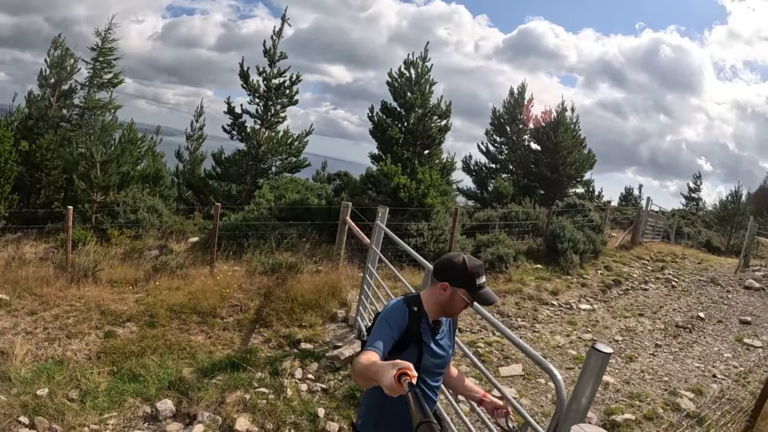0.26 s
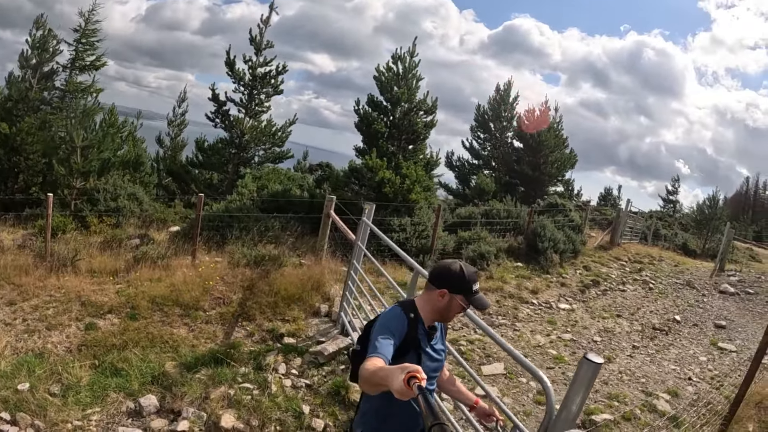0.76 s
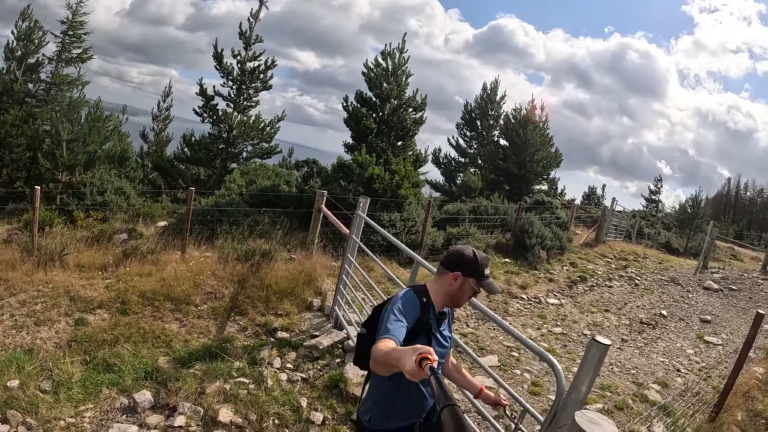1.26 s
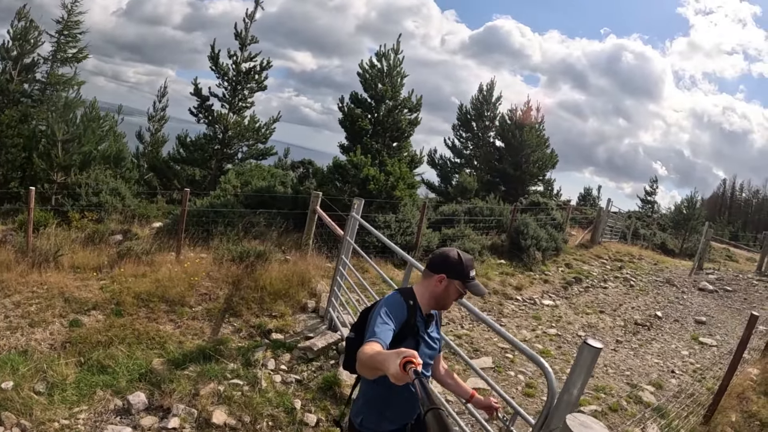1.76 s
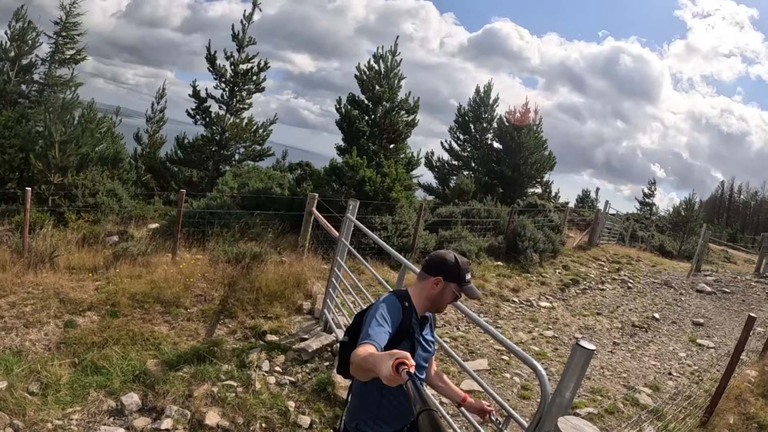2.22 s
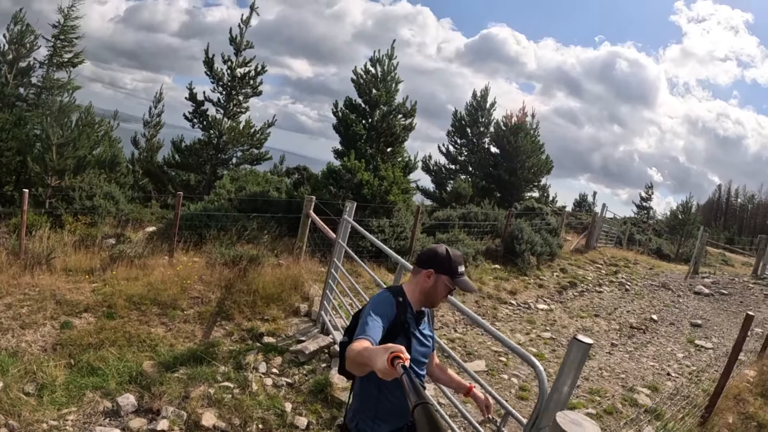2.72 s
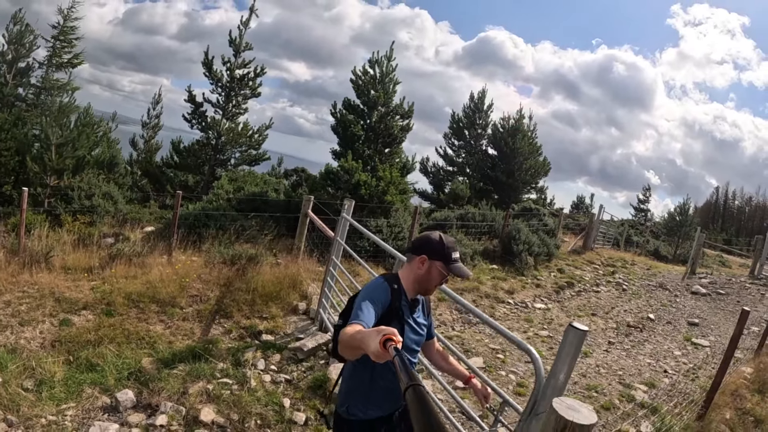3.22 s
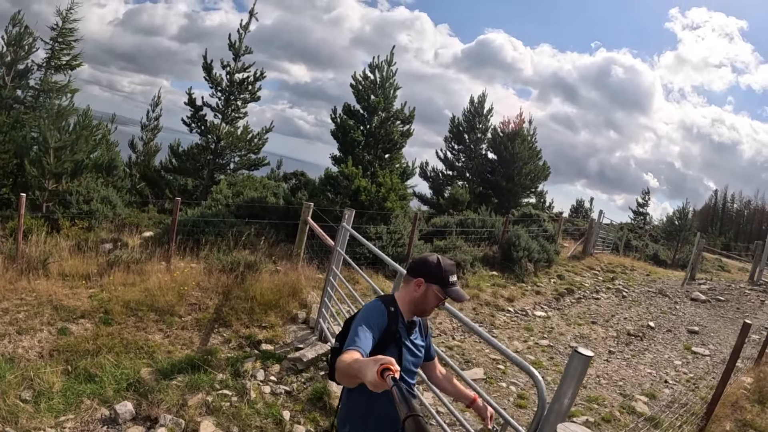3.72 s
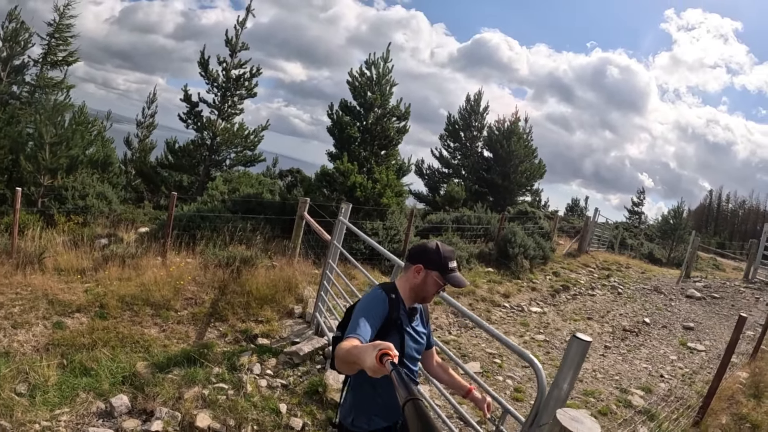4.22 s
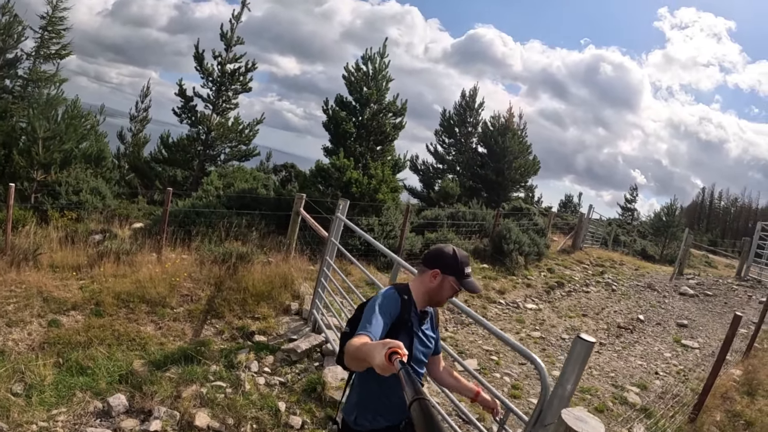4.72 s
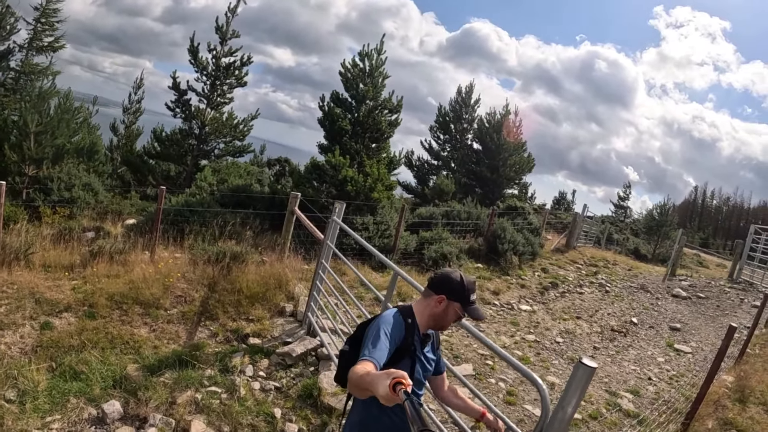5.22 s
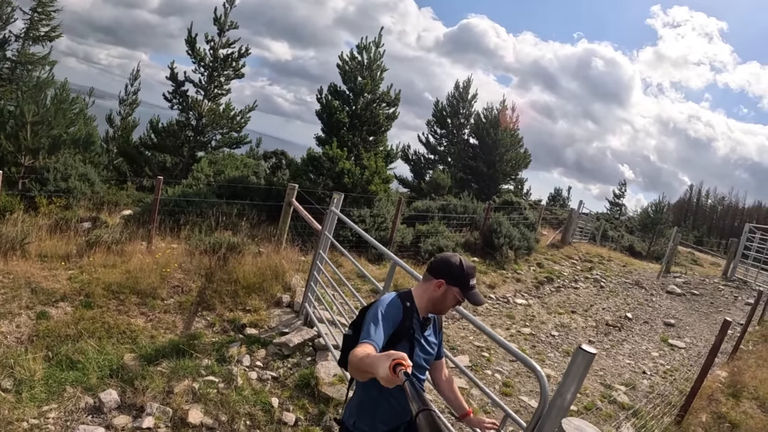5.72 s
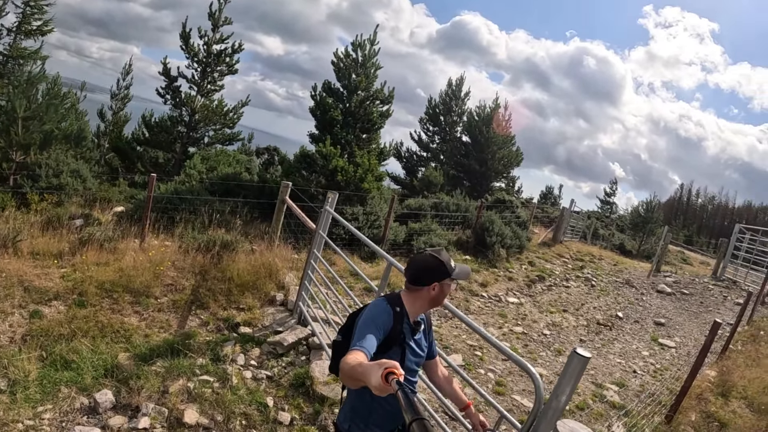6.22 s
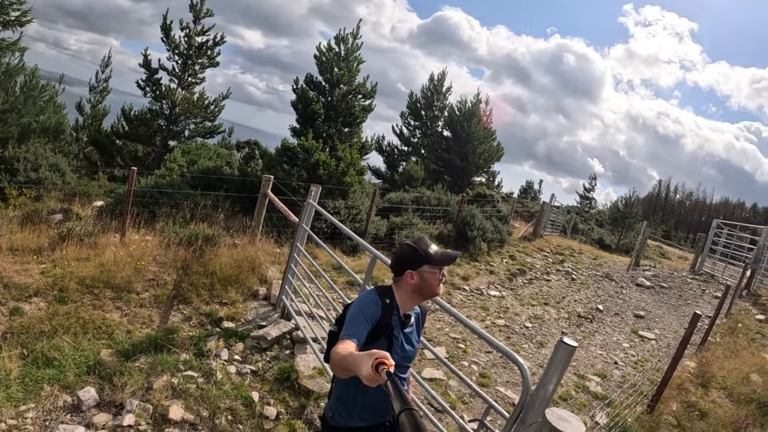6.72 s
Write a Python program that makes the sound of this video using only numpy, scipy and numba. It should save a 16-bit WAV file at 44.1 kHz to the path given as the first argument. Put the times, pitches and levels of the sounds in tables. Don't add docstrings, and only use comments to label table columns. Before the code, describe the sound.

On a breezy hillside, a steel field gate is jostled and unlatched at close range. Soft jolts and rattling surround sharp knocks, small parts ping, and long wavering tones overlap. After a short lull come rapid, heavy clangs with dull thuds from the post, then fading resonance and a lighter stir. Wind rumbles at the microphone; the sound is dry, open and nearly mono.

```python
import sys
import numpy as np
from numba import njit
from scipy import signal
from scipy.fft import rfft, irfft
from scipy.io import wavfile
from scipy.ndimage import uniform_filter1d

SR = 44100
rng = np.random.default_rng(int(sys.argv[2]) if len(sys.argv) > 2 else 0)


def volts_from_decibels(level):
    exponent = np.asarray(level, float) / 20
    return 10 ** exponent


def inscribe(sig):
    pcm = np.round(np.clip(np.atleast_2d(sig).T, -1, 1) * 32767)
    wavfile.write(sys.argv[1], SR, pcm.astype(np.int16))


N = 306936

COLOUR_HZ = (550, 2000, 5600, 11000)
# start_s, level_db, then against that level bass_db, top_db, crack_db
CLANKS = [(.0627, -5, -13, -21.5, -11), (0.9777, -6.5, -38, -31.5, -9), (1.042, 1.5, -36.5, -22, -10),
          (1.41, -6, -29, -34, -12), (1.6297, -7.5, -18.5, -20, -2), (2.151, -7, -20.5, -34, -8),
          (2.319, -8, -34, -32, -12), (2.4244, -1.7, -28.5, -30, -17), (3.1151, -14, -11, -33, -10),
          (3.38, -18.5, -25, -40, -8.5), (3.5014, -14.5, -21, -25, -5), (4.14, -34.5, 3, -46, -1.5),
          (4.342, -18.5, -10.5, -30, -10), (4.5281, -0.4, -17.5, -15.5, -7), (4.636, -6, -24, -20, -17),
          (4.8075, -4, -14.5, -21, -13), (4.8289, -5.5, -13, -10.5, -3), (5.1822, -3.5, -15, -8.5, -25),
          (5.1997, -4.5, -14, -10, -5), (5.2597, -7.5, -9, -11.5, -2.5), (5.3506, -0.9, -12.5, -23.5, -11),
          (5.4002, -7, -17, -24, -2), (5.4395, -2, -12, -19, -1), (6.36, -14, -5, -40, -14)]


def evened(x):
    return x / np.sqrt(np.mean(x ** 2) + 1e-20)


def read(hz, value, at_hz):
    return np.interp(np.log(at_hz + 1), np.log(np.asarray(hz) + 1), value)


def along(rows):
    s, *columns = np.transpose(rows)
    return [np.interp(np.arange(N) / SR, s, column) for column in columns]


def noise(points, patchy_db):
    hz = np.fft.rfftfreq(1024, 1 / SR)
    real, imag, patches = rng.standard_normal((N // 256 + 5, 513, 3)).T
    patches = uniform_filter1d(patches, size=10, axis=0)
    patches = evened(uniform_filter1d(patches, size=12, axis=1))
    colour_db = read(*np.transpose(points), hz)[:, None]
    bins = (real + 1j * imag) * volts_from_decibels(colour_db + patchy_db * patches)
    return evened(signal.istft(bins, nperseg=1024, noverlap=768)[1][:N])


def add(mix, s, db, hz, t60, rise, loose=1):
    part = mix[round(s * SR):][:SR]
    t = np.arange(len(part)) / SR
    level = volts_from_decibels(db - 60 * t / t60) * (1 - np.exp(-t / rise))
    part += level * np.sin(2 * np.pi * (hz * t + loose * rng.random()))


def hill_air():
    # pitch_hz, density_db (per Hz)
    air_colour = [(59, -37), (100, -10), (358, -1.5), (513, -0.5), (1280, -3), (1650, -15), (2630, -18.5),
                  (8640, -31), (16000, -28)]
    return volts_from_decibels(-54) * noise(air_colour, patchy_db=1.2)


def wind():
    # start_s, buffet_db
    gusts = [(0, -54), (.33, -44), (.5, -55), (.95, -53.5), (1.16, -44), (1.28, -78), (2.95, -82),
             (3.25, -68), (3.62, -63), (4.2, -105), (4.5, -55), (5.1, -62.5), (5.54, -52), (5.95, -50.5),
             (6.3, -52.5), (6.61, -46), (6.77, -55.5), (6.96, -46)]
    # pitch_hz, density_db (per Hz)
    buffet_colour = [(12, -15), (25, 0), (45, -12), (70, -8), (110, -36), (300, -90)]
    # pitch_hz, density_db (per Hz)
    roar_colour = [(30, -44), (55, -12), (80, -5), (140, -10), (220, -7.5), (350, -17.5), (700, -90)]
    step_s, flutter_s, flutter_db = .01, .05, 3
    steps = rng.standard_normal(round(N / SR / step_s) + 2)
    lumps = evened(signal.lfilter([1], [1, -np.exp(-step_s / flutter_s)], steps))
    flutter = np.interp(np.arange(N) / SR / step_s, np.arange(len(steps)), lumps)
    gust_db = along(gusts)[0] + flutter_db * flutter
    buffet = volts_from_decibels(gust_db) * noise(buffet_colour, patchy_db=2.5)
    roar = volts_from_decibels(-29 + .42 * gust_db) * noise(roar_colour, patchy_db=3.0)
    return buffet + roar


def hand():
    # start_s, shaking_db, grip (0-1, damps the ring)
    handling = [(0, -48, .1), (.11, -44, 0), (.25, -23.5, 0.21), (.5, -28.5, 0.14), (.95, -32, 0.14),
                (1.16, -26, 0.26), (1.92, -36, 0.13), (2.44, -27, 0.1), (3.57, -39, 0.41), (3.8, -66, 0.34),
                (4.2, -65, 0.05), (4.5, -25.5, 0.23), (5.31, -24.5, 0.22), (5.76, -21, 0.33),
                (6.07, -53.5, 0), (6.36, -39, 0), (6.53, -28, 0.32), (6.8, -43, 0.12)]
    press_s, shiver_s = 0.18, 0.13
    shake_db, grip = along(handling)
    since = np.arange(N) / SR - np.transpose(CLANKS)[0][:, None]
    press = (np.clip(1 + since / press_s, 0, 1) * (since < 0)).max(0)
    shiver = (np.exp(-abs(since) / shiver_s) * (since > 0)).max(0)
    rub_db = -42 + 0.9 * shake_db
    return rub_db, shake_db + 4 * shiver, grip + 0.17 * press


def bolt_rub():
    # start_s, rise_s, fall_s, top_db
    scuffs = [(.26, 0.085, .06, -41.5), (.36, 0.056, 0.21, -39), (.66, 0.15, 0.16, -49.5),
              (1.06, .09, .25, -46), (2.31, 0.017, 0.39, -49), (3.12, 0.016, 0.59, -48),
              (3.5, .1, 3.5, -66), (1.65, 0.11, 3.5, -60), (4.27, 0.04, 0.5, -50), (6.865, .01, .04, -57),
              (4.45, .07, 0.4, -48), (4.8, 0.085, 0.28, -35), (5.2, .05, .12, -51),
              (5.32, 0.055, 0.29, -36), (5.6, 0.064, 0.62, -49), (4.13, .01, .1, -62), (2.42, .02, .5, -50),
              (5.82, 0.049, .07, -45), (6.269, .07, 0.056, -61), (6.37, 0.074, 0.1, -55),
              (6.798, 0.017, 0.069, -55)]
    # pitch_hz, density_db (per Hz)
    rub_colour = [(2500, -7), (4000, 1.5), (5500, -7), (7000, -5), (9000, -4.5), (11000, -13.5),
                  (13000, -21), (16000, -38)]
    t = np.arange(N) / SR
    level = volts_from_decibels(hand()[0]) + volts_from_decibels(-76.5)
    for s, rise, fall, db in scuffs:
        late = t - s - rise
        shape_db = np.where(late < 0, 16 * late / rise, -34.5 * late / fall)
        level = level + volts_from_decibels(db + shape_db) * np.clip((t - s) / .01, 0, 1)
    grains = uniform_filter1d(rng.exponential(1, N) ** 2 - 2, size=60)
    grit = volts_from_decibels(2.0 * evened(grains))
    return level * evened(noise(rub_colour, patchy_db=1.5) * grit)


def latch_rings():
    # start_s, level_db, pitch_hz, t60_s, scatter (share of pitch)
    lone_tubes = [(0, -46, 881, .68, .0018), (.33, -35, 3600, .8, .15), (.41, -37, 3500, .5, .12),
                  (1.04, -32, 4170, 0.69, 0.059), (1.042, -31, 3900, 0.71, 0.05),
                  (1.045, -24.5, 1907, 0.44, 0.17), (1.63, -38, 3700, 0.5, .03),
                  (3.502, -37, 3920, .15, .052), (3.502, -43, 2760, .7, .035),
                  (3.502, -45, 4000, 0.48, .022), (-0.3, -37, 420, .07, 0.48), (5.40, -38, 3000, .8, 0.12),
                  (5.440, -17, 923, .32, .001), (5.441, -22, 630, 0.27, .2), (5.5, -37, 850, 1.6, .25),
                  (5.5, -39, 480, 1.9, .3), (5.440, -17, 946, 0.4, .0082), (6.41, -42, 965, 1.1, 0.04),
                  (6.41, -40, 3600, .6, .3), (5.7, -40, 520, 1.5, .15), (6.452, -41.5, 600, 0.76, 0.21),
                  (6.409, -39.5, 1005, 1.2, .003), (5.44, -26, 1530, .15, .03), (4.528, -30, 2800, .4, .05),
                  (2.319, -60, 13500, .25, .12), (2.424, -57, 13000, .35, .15), (2.837, -41, 3500, .3, .05),
                  (3.501, -38, 3900, .2, .08), (3.501, -40, 2850, .6, .05), (5.55, -40, 3000, .9, .15),
                  (5.82, -37, 900, .9, .35), (5.9, -39, 600, 1, .35), (6.359, -35, 1050, .6, .12),
                  (6.455, -43, 5200, .35, .25), (.063, -37, 4100, .6, .1)]
    # start_s, level_db, pitch_hz, t60_s
    pings = [(0.062, -33.5, 6040, .1), (1.042, -43, 6930, .34), (1.41, -43, 7830, 0.1),
             (2.424, -52, 8050, .36), (2.424, -56, 11500, .25), (4.528, -36, 6000, .06),
             (6.41, -46, 6800, .2), (6.452, -46, 8300, .15), (3.569, -52, 10700, 0.079),
             (4.14, -60, 5400, .06), (5.073, -46.5, 6870, 0.18), (5.075, -49, 5260, 0.15),
             (5.074, -60, 14100, .15), (5.074, -53, 10060, .2), (5.20, -30, 6700, 0.35),
             (5.26, -35.5, 11100, 0.24), (5.438, -22.5, 8320, .04)]
    out = np.zeros((3, N))
    for s, db, hz, t60, scatter in list(lone_tubes) + [(*ping, .035) for ping in pings]:
        for k, (detune, life) in enumerate(rng.uniform(-1, 1, (9, 2))):
            part_hz = hz * (1 + scatter * detune)
            add(out[k % 3], s, db - 2, part_hz, t60 * (1 + .3 * life), rise=.0008)
    wobble = uniform_filter1d(rng.standard_normal((3, N)), size=500, axis=1)
    wobble = evened(uniform_filter1d(wobble, size=500, axis=1))
    return (out * volts_from_decibels(1.5 * wobble)).sum(0)


def blows():
    # start_s, level_db, top_db (against the level)
    jolts = [(0.021, -44, -9), (0.0531, -21, -27), (.171, -12.5, -40), (0.199, -13, -32),
             (0.3048, -11, -46), (0.3297, -10.5, -41), (0.352, -13, -33), (0.4089, -6.5, -36),
             (0.4307, -11.5, -30), (0.4538, -12, -42), (.723, -29, -30), (0.7952, -37, -25),
             (1.2092, -10.5, -35), (1.299, -11.5, -39), (1.4498, -20, -31), (1.512, -14, -34),
             (1.882, -33, -39), (2.5785, -10, -54), (2.8365, -16, -36.5), (2.931, -22.5, -31),
             (3.047, -17.5, -49), (3.4745, -24, -46), (3.5688, -19.5, -33), (4.312, -35, -30),
             (4.4208, -17.5, -44), (5.0729, -23.5, -17), (5.8892, -31.5, -31), (6.4105, -11, -26),
             (6.4575, -10, -32), (6.4747, -17.5, -26)]
    rows = []
    for s, db, bass, top, crack in CLANKS:
        rows.append((s, db, bass, -7.5 + 0.39 * top, top, crack))
    for s, db, top in jolts:
        bass = min(-33 - 1.11 * db, 8)
        rows.append((s, db, bass, -4.0 + 0.39 * top, top, -8))
    return sorted(rows)


@njit(fastmath=True)
def ring(cos, sin, loss, spread, grip, at, blow_re, blow_im, reach, rattle):
    modes, out, e = len(loss), np.zeros(len(grip)), 0
    re, im = np.zeros(modes), np.zeros(modes)
    in_re, in_im = np.zeros(modes), np.zeros(modes)
    for n in range(len(grip)):
        while e < len(at) and at[e] <= n:
            in_re += blow_re[e]
            in_im += blow_im[e]
            e += 1
        total, x, y = 0., cos[n // 256], sin[n // 256]
        for m in range(modes):
            keep = 1 - loss[m] * grip[n]
            a = keep * re[m] + spread[m] * in_re[m] + reach[m] * rattle[n]
            b = keep * im[m] + spread[m] * in_im[m]
            c = (1 - spread[m]) * in_re[m] + 1e-15
            d = (1 - spread[m]) * in_im[m] + 1e-15
            re[m], im[m] = a * x[m] - b * y[m], a * y[m] + b * x[m]
            in_re[m], in_im[m] = c * x[m] - d * y[m], c * y[m] + d * x[m]
            total += re[m]
        out[n] = total
    return out


def gate(count=450):
    # pitch_hz, level_db, t60_s
    tubes = [(513, -3.5, 1.17), (572, -8.5, 1.7), (872, -19.5, 2.8), (923, -4.5, 1.02), (949, -5.5, 1.37),
             (1167, -7, 1.1), (1262, -7.5, 1.5), (1345, -11, 1.2), (1395, -5.5, 0.66), (1545, -6, 1.2),
             (1005, -8.5, 2.74), (1640, -7, 0.71), (1661, -4.5, 0.75), (1714, -10, 1.4), (1580, -14, 0.97),
             (1850, -11, 0.9), (1955, -9, 1.1), (2025, -10, 0.6), (2100, -13, 0.7), (2200, -14, 0.7),
             (2330, -12, 0.8), (2500, -10, .7), (2615, -12, 1.2), (2700, -11, 1.1), (2800, -7, 0.95),
             (3068, -11, 1.1), (3688, -13, 1.14), (3785, -16, 1.3), (3883, -19, 1.3), (3991, -17, .8)]
    # pitch_hz, level_db (of one mode), t60_s
    mesh = [(157, -19, 0.48), (325, -20, 1.4), (423, -7.5, 1.23), (580, -7, 0.73), (920, -8, 1.04),
            (1400, -8.5, 1.13), (1970, -14.5, 1.23), (3540, -10, 0.75), (4270, -12.5, 0.68),
            (5900, -8.5, 0.4), (7730, -6.5, 0.4), (13400, -17.5, 0.28), (16000, -22, 0.23)]
    tube_hz, tube_db, tube_t60 = np.transpose(tubes)
    twin_hz = tube_hz * (1 + 0.007 * rng.uniform(-1.097, 1, len(tube_hz)))
    f, f_db, f_t60 = np.transpose(mesh)
    mesh_hz = 170 + 15700 * ((np.arange(count) + rng.random(count)) / count) ** 1.7
    mesh_db = read(f, f_db, mesh_hz) + 8 * (rng.random(count) - .55)
    mesh_t60 = read(f, f_t60, mesh_hz) * np.exp(.15 * rng.standard_normal(count))
    hz = np.r_[tube_hz, twin_hz, mesh_hz]
    db = np.r_[tube_db, tube_db - 1.5, mesh_db]
    t60 = np.r_[tube_t60, tube_t60 * .8, mesh_t60]

    s, level_db, bass, shine, top, _ = np.transpose(blows())
    colours = np.transpose([bass, 0 * s, shine, top])
    colour_db = np.array([read(COLOUR_HZ, colour, hz) for colour in colours])
    luck = rng.random((len(s), 2, len(hz)))
    clumps = uniform_filter1d(rng.standard_normal((len(s), len(hz))), size=16, axis=1)
    spot_db = 2.2 * evened(clumps) + 6.3 * (luck[:, 0] - .5)
    blow_db = level_db[:, None] - 18.2 + colour_db + db + spot_db
    blow = volts_from_decibels(blow_db) * np.exp(2j * np.pi * luck[:, 1])
    fill_s = .0004 + 1500 / hz ** 2
    spread = 1 - np.exp(-1 / (fill_s * SR))

    _, rattle_db, grip = hand()
    taps = volts_from_decibels(3.3 * np.minimum(rng.exponential(1, N), 3)) * (rng.random(N) < 500 / SR)
    taps = taps * rng.choice([-1., 1.], N)
    rattle_colour_db = read((300, 1500, 5000, 14000), (-8.0, -2.0, -17.0, -51.0), hz)
    reach = volts_from_decibels(db + rattle_colour_db + 5.7 * rng.random(len(hz)))
    reach = reach * rng.choice([-1., 1.], len(hz))

    waver = evened(uniform_filter1d(rng.standard_normal((N // 256 + 1, len(hz))), size=12, axis=0))
    turn = 2 * np.pi * (hz + 4.0 * waver) / SR
    loss = np.log(1000) / (t60 * SR)
    damping = volts_from_decibels(10.5 * (np.clip(grip, 0, 1) + 0.0221))
    at = np.round(s * SR).astype(np.int64)
    return ring(np.cos(turn), np.sin(turn), loss, spread, damping, at,
                blow.real.copy(), blow.imag.copy(), reach, volts_from_decibels(rattle_db - 31.5) * taps)


def cracks():
    out = np.zeros(N + 1024)
    t = np.arange(1024) / SR - .002
    hz = np.fft.rfftfreq(1024, 1 / SR)
    snap = np.maximum(t, 0) / .0005 * np.exp(1 - t / .0005)
    snap = snap + .25 * (t > .0005) * np.exp(-t / .003)
    for s, db, bass, shine, top, crack_db in blows():
        colour_db = (bass - 30, bass - 8, 0, shine - 4, top - 9, top - 19)
        colour = volts_from_decibels(read((150, *COLOUR_HZ, 16000), colour_db, hz))
        burst = irfft(rfft(rng.standard_normal(1024) * snap) * colour)
        out[round((s - .002) * SR):][:1024] += volts_from_decibels(db + crack_db + 5) * burst / abs(burst).max()
    return out[:N]


def post():
    # start_s, level_db
    knocks = [
        (.062, -24),
        (4.140, -27.5),
        (4.528, -21),
        (4.808, -21),
        (5.182, -26.5),
        (5.440, -16),
    ]
    # pitch_hz, level_db, t60_s
    post_modes = [(184.2, -16, 0.76), (207, -8.5, 0.22), (422, -13, 0.25), (494, -8, 0.12), (515, 2.5, 0.3),
                  (727, -11.5, 0.2), (856, -19, .1), (944, -11, 0.28), (1110, -2, 0.12), (1390, -2, 0.038),
                  (1510, 1, 0.056), (1790, -12, .05), (2760, -5, 0.045)]
    out = np.zeros(N)
    for s, db in knocks:
        for hz, mode_db, t60 in post_modes:
            add(out, s, db + mode_db, hz, t60, rise=2.8 / hz, loose=0)
    return out


def members():
    RAIL_HZ, BAR_HZ, POLE_HZ, HOOP_HZ, LOOP_HZ = 925, 1303, 1525, 2065, 2306
    STAY_HZ, BRACE_HZ, CAP_HZ, TIP_HZ = 2649, 3760, 3883, 3994
    # start_s, level_db, pitch_hz, t60_s
    tones = [(.063, -29, BAR_HZ, 3), (.063, -29, STAY_HZ, 2.5), (.2, -32, RAIL_HZ, 2.5),
             (.43, -32, BAR_HZ, 2.5), (.33, -42, BRACE_HZ, 2), (.063, -43, TIP_HZ, 2),
             (1.042, -23, HOOP_HZ, .9), (1.042, -26, STAY_HZ, 2), (1.042, -28, CAP_HZ, 1.4),
             (1.042, -32, BRACE_HZ, 1.4), (1.042, -28, TIP_HZ, 1.1), (1.042, -28, POLE_HZ, 2.5),
             (1.41, -28, HOOP_HZ, 1.2), (1.63, -29, STAY_HZ, 2), (1.63, -43, BRACE_HZ, 2),
             (1.63, -36, BAR_HZ, 3), (1.63, -42, TIP_HZ, 1.2), (2.151, -31, HOOP_HZ, 1),
             (2.151, -36, STAY_HZ, 2), (2.151, -34, LOOP_HZ, 1.5), (2.424, -24, HOOP_HZ, 1.2),
             (2.424, -26, LOOP_HZ, .9), (2.424, -31, STAY_HZ, 1), (2.424, -40, BRACE_HZ, 1.2),
             (2.58, -35, POLE_HZ, 2.5), (3.115, -36, BAR_HZ, 1.8), (3.115, -42, STAY_HZ, 1.5),
             (3.115, -35, POLE_HZ, 1.5), (3.501, -35, STAY_HZ, 1.1), (3.501, -37, BAR_HZ, 1.4),
             (3.501, -45, RAIL_HZ, 2), (4.528, -25, HOOP_HZ, 1.2), (4.528, -28, BAR_HZ, 2.5),
             (4.528, -32, STAY_HZ, 2.5), (4.528, -38, BRACE_HZ, 3), (4.829, -29, HOOP_HZ, 1.3),
             (4.829, -27, BAR_HZ, 3), (4.829, -33, STAY_HZ, 3), (5.2, -33, BRACE_HZ, 1.5),
             (5.2, -25, STAY_HZ, 1.2), (5.2, -24, BAR_HZ, 2.5), (5.35, -24, HOOP_HZ, 1),
             (5.44, -32, STAY_HZ, 2), (5.44, -40, BRACE_HZ, 2.2), (5.5, -36, RAIL_HZ, 3.5),
             (6.41, -44, BRACE_HZ, 2), (6.451, -31, BAR_HZ, 1.6), (6.41, -38, STAY_HZ, 2.2),
             (6.451, -35, RAIL_HZ, 1.5)]
    # pitch (share), level_db, t60 (share)
    neighbours = [(1, -1, 1), (.992, -7, .75), (1.011, -8, .65)]
    out = np.zeros(N)
    t = np.arange(N // 32 + 2) * 32 / SR
    for hz in sorted({row[2] for row in tones}):
        for share, near_db, life in neighbours:
            power = np.zeros(len(t))
            for s, db, f, t60 in tones:
                if f == hz:
                    fall_db = 60 * np.maximum(t - s, 0) / (t60 * life)
                    power += volts_from_decibels(2 * (db + near_db - fall_db)) * np.clip((t - s) / .008, 0, 1)
            wander = uniform_filter1d(rng.standard_normal((2, len(t))), size=60, axis=1)
            drift, flicker = evened(wander)
            level = np.interp(np.arange(N) / SR, t, np.sqrt(power) * volts_from_decibels(1.5 * flicker))
            turns = np.cumsum(hz * share + 2.5 * np.repeat(drift, 32)[:N]) / SR
            out += level * np.sin(2 * np.pi * turns)
    return out


def faint_sides(mid):
    # pitch_hz, side_db (against the middle)
    side_colour = [(60, -19), (110, -20), (200, -21), (380, -23), (700, -34), (1290, -40), (2380, -36),
                   (4400, -22), (8120, -18), (15000, -12)]
    hz = np.fft.rfftfreq(1024, 1 / SR)
    smear = rfft(rng.standard_normal(1024) * np.exp(-np.arange(1024) / 150))
    side_level = volts_from_decibels(read(*np.transpose(side_colour), hz) - 6.0)
    side = signal.oaconvolve(mid, irfft(smear / abs(smear) * side_level))[:N]
    return np.array([mid + side, mid - side])


def scene():
    weather = hill_air() + wind()
    steel = bolt_rub() + latch_rings() + gate() + cracks() + post() + members()
    return faint_sides(weather + steel)


def low_pass(x):
    return signal.sosfilt(signal.butter(12, 16820, fs=SR, output="sos"), x)


def record(dry):
    power = uniform_filter1d((dry ** 2).mean(0), size=300)
    power_db = 10 * np.log10(abs(power) + 1e-12)
    fall_db = np.arange(N) * 19.0 / SR
    held_db = np.maximum.accumulate(power_db + fall_db) - fall_db
    over_db = np.maximum(held_db + 14.5, 0)
    ducked = dry / volts_from_decibels(0.43 * uniform_filter1d(over_db, size=150))
    rounded = 1.3 * np.tanh(ducked / 1.3)
    edge = signal.firwin(255, 16000, window=("kaiser", 8), fs=SR)
    mix = signal.oaconvolve(rounded, edge[None], "same")
    return low_pass(mix)


dry = scene()
out = record(dry)
inscribe(out)
```